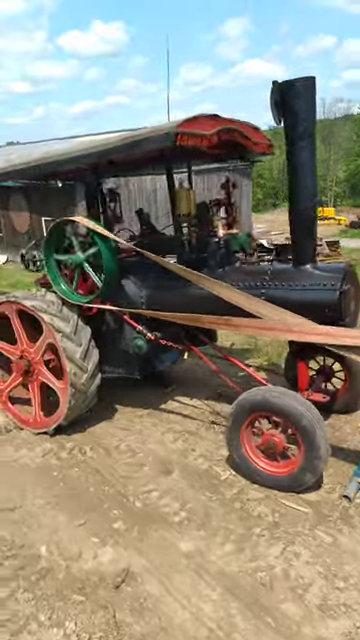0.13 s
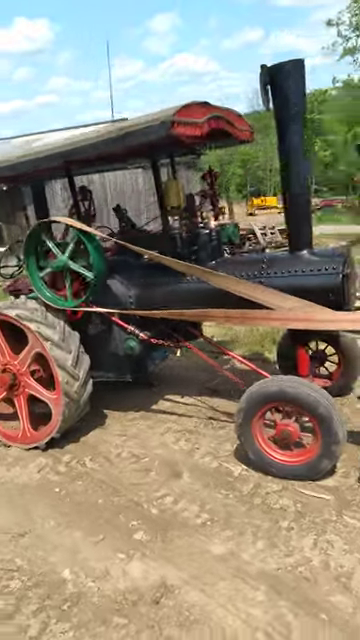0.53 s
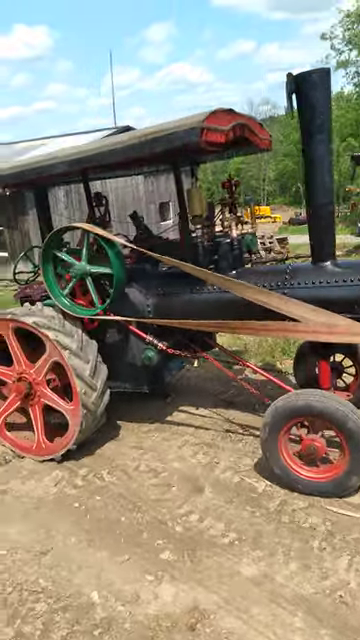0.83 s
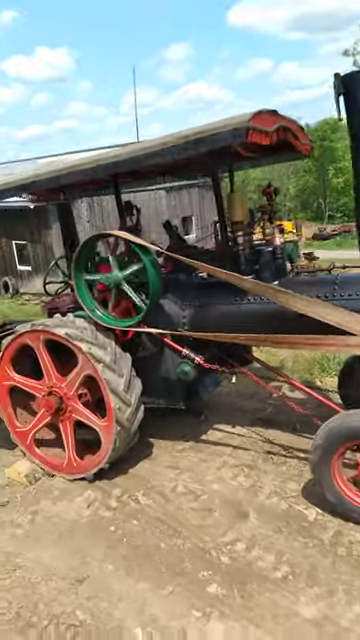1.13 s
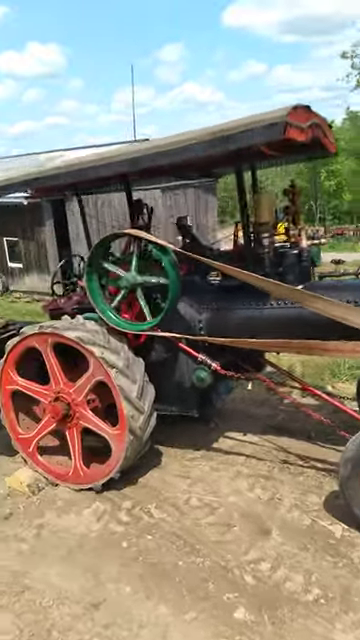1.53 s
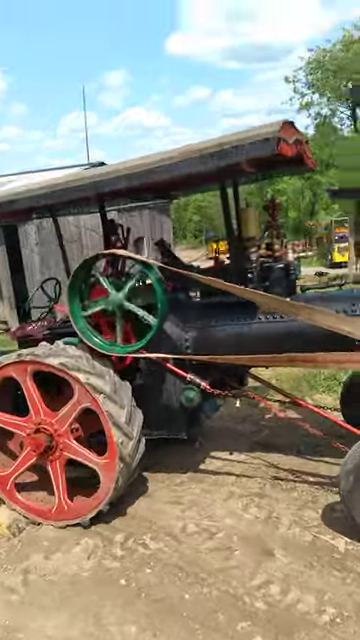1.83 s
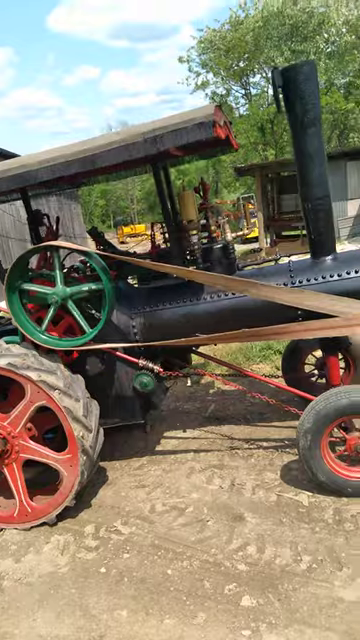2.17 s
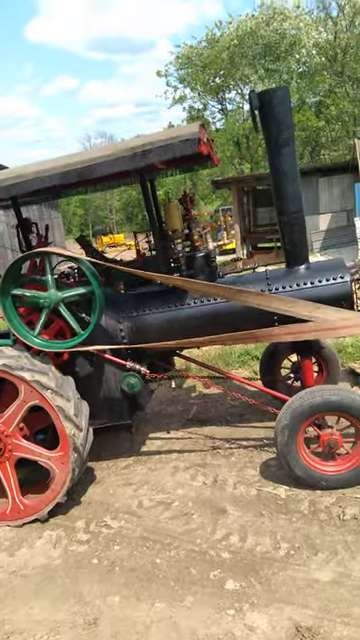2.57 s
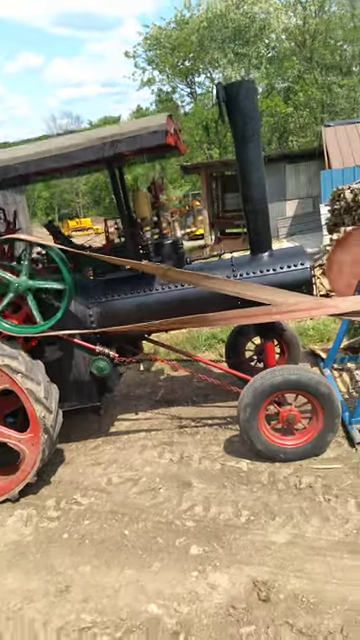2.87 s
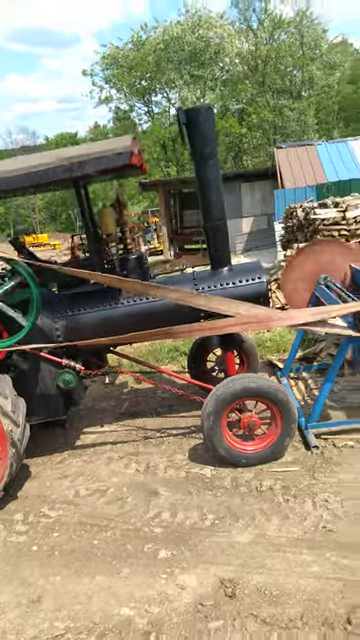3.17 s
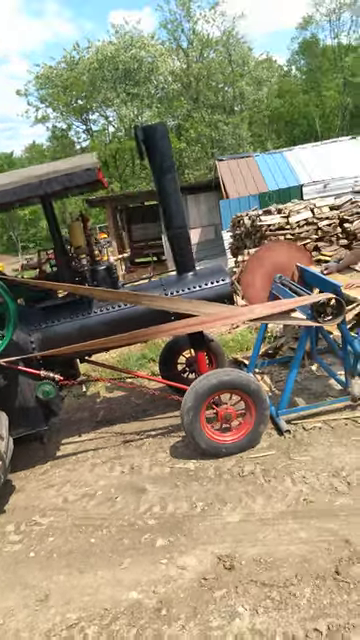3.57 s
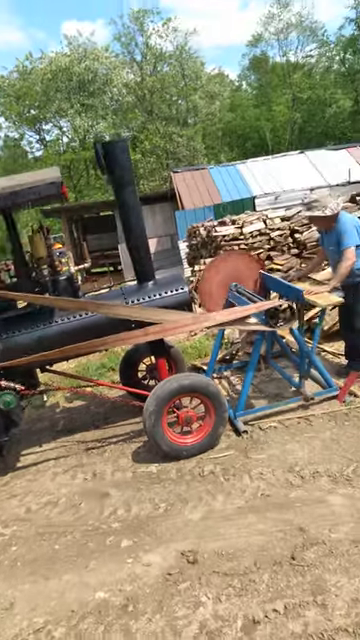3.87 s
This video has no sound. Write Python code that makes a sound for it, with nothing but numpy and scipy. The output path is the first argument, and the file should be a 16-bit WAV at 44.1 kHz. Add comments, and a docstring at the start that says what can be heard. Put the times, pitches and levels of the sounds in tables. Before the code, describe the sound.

Circular saw cutting wood outdoors beside a small steam engine. At 0-0.5 s the blade brushes wood, an offcut scrapes thinly, and knocks tumble near 0.35 s. Until 1.65 s there is quiet rumbling, hissing puffs, valve clicks and a faint whine near 1.1 s. From 1.75 to 3.5 s a loud, shrill rasp, right-heavy, slows slightly with dull knocking; then ringing tones, soft knocks and airy brushes from 3.75 s.

```python
"""A loose offcut scrapes and a saw blade brushes wood over a small steam traction engine idling outdoors.
The cut piece knocks and tumbles; then a log meets the belt-driven circular saw and the engine slows.
Shaped noise makes the tooth rasp, the scrape and the steam; resonators make the ringing disc; decaying
sines make the knocks; pulses make the exhaust. The saw is louder on the right; loud peaks overload softly."""
import sys
import numpy as np
from scipy import signal
from scipy.fft import rfft, irfft, next_fast_len
from scipy.io import wavfile
from scipy.ndimage import uniform_filter1d, map_coordinates

SR = 44100
rng = np.random.default_rng(int(sys.argv[2]) if len(sys.argv) > 2 else 0)


def to_wav(s):
    """Save 16-bit WAV."""
    ch = np.atleast_2d(s).T  # columns
    pcm = np.round(np.clip(ch, -1, 1) * 32767)  # PCM
    wavfile.write(sys.argv[1], SR, pcm.astype(np.int16))


N = 176400
T = np.arange(N) / SR

# The log in the blade: start_s [s], rasp_level_db [dB], ring_over_rasp_db [dB],
# rasp_left_right_db [dB, used about its mean over time]
CUT_STAGES = [(1.66, -57, 0, -16), (1.71, -18.5, -29, -14.5), (1.79, -9, -6, -8.5), (2.39, -7, -9, -8),
              (2.87, -8.5, -10.5, -13), (3.47, -9, -14.5, -11.5), (3.54, -19, -8, -14), (3.67, -30, -3, -8),
              (3.76, -25.5, -6.5, -10.5)]
# Left-right likeness of the saw and offcut noise: pitch_hz [Hz], likeness [-1 to 1]
SAW_LIKENESS = [(60, 0.82), (240, 0.25), (950, 1), (3770, -0.44), (15000, -0.11)]
# Left-right likeness of the engine noise: pitch_hz [Hz], likeness [-1 to 1]
IDLE_LIKENESS = [(60, 0.94), (180, 0.98), (550, 0.74), (1650, 1), (4970, -0.32), (15000, 0.33)]
# Port balance for the engine and offcut: pitch_hz [Hz], left_right_db [dB]
IDLE_BALANCE = [(60, 0.5), (290, 1.5), (640, -8.5), (1410, 2.5), (3100, -8.5), (6820, -19), (15000, -22)]


def amp(db):
    """Amplitude factor of a level in dB."""
    return 10 ** (np.asarray(db) / 20)


def unit(x):
    """x scaled to an rms of 1."""
    return x / np.sqrt(np.mean(x ** 2) + 1e-20)


def along(points, hz):
    """Read a curve of (Hz, value) points on a log frequency axis."""
    f, v = np.transpose(points)
    return np.interp(np.log(hz + 1), np.log(f + 1), v)


def curves(rows):
    """One value per sample for each column after the time."""
    s, *cols = np.transpose(rows)
    return [np.interp(T, s, c) for c in cols]


def wobble(rate):
    """A smooth random curve through `rate` random knots a second."""
    coarse = T[::64]
    knots = rng.standard_normal(int(N * rate / SR) + 4)
    return np.interp(T, coarse, map_coordinates(knots, [coarse * rate]))


def filtered(x, response):
    """Multiply the spectrum of x by a complex response of frequency."""
    m = next_fast_len(N + SR // 2)
    return irfft(rfft(x, m) * response(np.fft.rfftfreq(m, 1 / SR)), m)[..., :N]


def peak(f, hz, width):
    """Response of one causal resonance, 1 at its centre."""
    return 1j * f * width / (hz * hz - f * f + 1j * f * width)


def ports(pair, balance):
    """Two microphone ports colour the sound oppositely about a mean gain of 1; the left hears it later."""
    left_lag_s = .00013

    def response(hz):
        share = 2 / (1 + amp(np.outer([-1, 1], along(balance, hz))))
        return share * np.exp(np.outer([-1, 0], 2j * np.pi * hz * left_lag_s))

    return filtered(pair, response)


def rush(gain, likeness, patchy_db):
    """Stereo noise of rms 1: random patches of gain in time and pitch, then colour and stereo width."""
    z = signal.stft(rng.standard_normal((2, N)), nperseg=512)[2]
    field = uniform_filter1d(rng.standard_normal(z.shape[1:]), 3, 0)
    field = uniform_filter1d(field, 10, 1)
    pair = signal.istft(z * amp(patchy_db * unit(field)), nperseg=512)[1][:, :N]

    def mid_side(hz):
        turn = np.arccos(np.clip(along(likeness, hz), -1, 1)) / 2
        return gain(hz) * np.array([np.cos(turn), np.sin(turn)])

    mid, side = filtered(pair, mid_side)
    return unit(np.array([mid + side, mid - side]))


def exhaust():
    """Each exhaust beat sends one low thump up the stack, a sine under a Gaussian swell."""
    # Engine beats: start_s [s], beats_so_far [count]
    beat_count = [(-.062, -1), (.99, 12), (1.623, 20), (2.008, 25), (2.566, 32), (3.005, 37), (3.449, 42),
                  (3.831, 46), (4.03, 48)]
    # Exhaust loudness: start_s [s], level_db [dB]
    exhaust_level = [(0.0, -54), (0.72, -56.5), (2.29, -40), (3.32, -46.5), (4.0, -46.5)]
    thump_hz, thump_s, scatter_db = 79.4, 0.012, 2
    count = uniform_filter1d(curves(beat_count)[0], size=4410, mode="nearest")
    at = np.flatnonzero(np.diff(np.floor(count)))
    blows = np.zeros(N)
    blows[at] = amp(rng.normal(0, scatter_db, len(at)))
    t = np.arange(-2200, 2200) / SR
    thump = np.exp(-(t / thump_s) ** 2) * np.sin(2 * np.pi * thump_hz * t)
    return unit(signal.fftconvolve(blows, thump, "same")) * amp(curves(exhaust_level)[0])


def running_gear():
    """The running gear rumbles and clatters as coloured noise of wavering level."""
    # Colour of the running gear: pitch_hz [Hz], density_db [dB per Hz, relative]
    gear_colour = [(30, -36), (45, -44), (65, -3), (153, -5), (191, 1), (243, -11), (363, -5.5), (760, -18),
                   (1030, 0), (1220, -12.5), (1400, 1), (1540, -1), (1800, -11.5), (2600, -29),
                   (5280, -120)]
    noise = rush(lambda f: amp(along(gear_colour, f)), IDLE_LIKENESS, patchy_db=0.5)
    return noise * amp(-40.5 + 2.2 * wobble(29.8))


def gear_whine():
    """A gear whines for a moment: one sine of slightly wandering pitch, faded in and out."""
    whine_hz, wander_hz, level_db = 1349, 3, -43.5
    tone = np.sqrt(2) * np.sin(2 * np.pi * np.cumsum(whine_hz + wander_hz * wobble(11)) / SR)
    start_s, end_s = 0.96, 1.28
    fade = np.interp(T, [start_s - .1, start_s, end_s, end_s + 0.059], [0, 1, 1, 0])
    return tone * amp(level_db) * fade


def steam():
    """Leaking steam hisses, puffs at a steady period until the cut is under way, and bursts as valve clicks."""
    # Colour of the steam: pitch_hz [Hz], density_db [dB per Hz, relative]
    steam_colour = [(1060, -35), (1800, -16), (2100, -2.5), (4360, -7.5), (6690, -7.5), (7880, -1),
                    (9460, 4), (11600, -7.5), (15900, -16)]
    # Valve gear clicks: start_s [s], level_db [dB, before click_trim_db]
    valve_clicks = [(0.6195, -26), (0.6913, -28), (0.9357, -27), (1.099, -26.5), (1.121, -26), (1.169, -20),
                    (1.2546, -30), (1.2794, -28), (1.3279, -26), (1.4122, -28), (1.4354, -26),
                    (1.5364, -29), (1.568, -31), (1.5908, -26), (1.6407, -26)]
    leak_db, click_trim_db, click_decay_s = -48.5, -17, 0.0067
    puff_start_s, puff_every_s, puff_s = .146, .158, 0.031
    puff_db, puff_swing_db = -50, 3
    since = (T - puff_start_s) % puff_every_s
    puffs = amp(puff_db + puff_swing_db * wobble(42.6)) * np.exp(-(since / puff_s) ** 2)
    level = amp(leak_db) + puffs * (T < CUT_STAGES[1][0])
    for s, db in valve_clicks:
        level = level + amp(db + click_trim_db) * (T > s) * np.exp(-np.abs(T - s) / click_decay_s)
    return rush(lambda f: amp(along(steam_colour, f)), IDLE_LIKENESS, patchy_db=0.5) * level


def engine():
    """Running gear, whine and steam reach the two ports together."""
    return ports(running_gear() + steam() + gear_whine(), IDLE_BALANCE)


def offcut():
    """A loose offcut scrapes the disc: banded noise that dies away as the cut piece comes free."""
    # Scrape bands: pitch_hz [Hz], width_hz [Hz], level_db [dB]
    scrape_bands = [(2730, 120, 4), (3750, 200, 4.5), (5500, 410, 2), (11100, 130, 6), (15400, 260, -11)]
    # Scrape loudness: start_s [s], level_db [dB]
    scrape_level = [(0, -35), (.15, -36.5), (.19, -47), (.25, -51.5), (.27, -41), (.38, -41.5), (.41, -49),
                    (.45, -47), (.6, -72)]
    floor_db, swing_db = -13.5, 3

    def colour(f):
        bands = sum(amp(db) * peak(f, hz, width) for hz, width, db in scrape_bands)
        return np.abs(amp(floor_db) * (f > 1800) + bands)

    level = amp(curves(scrape_level)[0] + swing_db * wobble(22.3)) * (T < scrape_level[-1][0])
    return ports(rush(colour, SAW_LIKENESS, patchy_db=2) * level, IDLE_BALANCE)


def knocks():
    """A cut piece falls and tumbles: each blow and its noisy rattle ring the modes of the wood."""
    # Blows: start_s [s], level_db [dB], rattle_s [s]
    wood_blows = [(.3475, -19, .004), (.353, -21, .02), (.41, -28, .03), (.445, -28, .025), (3.6, -32, .06),
                  (3.735, -28, .06)]
    # Modes of the cut piece: pitch_hz [Hz], level_db [dB], t60_s [s to fall 60 dB]
    wood_modes = [(200, -1, .04), (370, -2, .05), (600, -5, .03), (1491, -3, .02), (2200, -7, .012)]
    rise_s = .0015
    blows, t, noise = np.zeros(N), T[:SR // 10], rng.standard_normal(N)
    for s, db, rattle_s in wood_blows:
        blows[round(s * SR)] += amp(db)
        rattle = noise * (T > s) * np.exp(-np.abs(T - s) / rattle_s)
        blows += amp(db) * rattle / np.sqrt(rattle_s * SR)
    body = sum(amp(db - 60 * t / t60) * np.sin(2 * np.pi * hz * t) for hz, db, t60 in wood_modes)
    return signal.fftconvolve(blows, body * (1 - np.exp(-t / rise_s)))[:N]


def hum():
    """The disc's two lowest modes swell and fade as sines of wandering pitch."""
    # Mode loudness: start_s [s], lower_db [dB], upper_db [dB]
    hum_levels = [(0.03, -35.5, -49), (0.122, -44, -55), (0.143, -32, -39), (0.19, -38, -51),
                  (0.224, -33, -39), (0.34, -34, -50), (0.37, -39, -45), (0.46, -39, -57),
                  (0.52, -49.5, -70), (1.51, -81, -71), (1.85, -41, -29.5), (1.89, -39, -47),
                  (1.93, -30, -24), (2.32, -44, -28.5), (2.35, -34, -33), (2.45, -38, -18),
                  (2.65, -35.5, -32.5), (2.81, -27.5, -25), (2.92, -48, -38), (3.02, -26, -32.5),
                  (3.69, -72, -38.5), (3.82, -36.5, -45.5), (4.0, -59, -46)]
    swing_db = 2
    pitches_hz, wanders_hz, left_right_db = (194, 539), (4, 3), (4.5, 10.5)
    out = np.zeros((2, N))
    for db, hz, wander, pan in zip(curves(hum_levels), pitches_hz, wanders_hz, left_right_db):
        level = amp(db + swing_db * wobble(20))
        tone = np.sqrt(2) * np.sin(2 * np.pi * np.cumsum(hz + wander * wobble(40.59)) / SR)
        out += np.outer(amp([pan / 2, -pan / 2]), level * tone)
    return out


def proud_tooth():
    """One tooth stands proud and knocks the bench once a turn, each knock a few short-lived modes."""
    # Knocking turns: start_s [s], turns_so_far [count], level_db [dB, before knock_trim_db]
    proud_turns = [(2.1, 0, -34), (2.353, 5, -22), (2.571, 9, -23), (2.86, 14, -23), (3.155, 19, -30)]
    # Bench modes: pitch_hz [Hz, before scatter], level_db [dB, relative], left_right_db [dB]
    bench_modes = [(368, -15, -6), (904, 0, -15), (1284, -8, -6)]
    rise_s, knock_trim_db, level_scatter_db, pitch_scatter = 0.0051, 1, 2, 0.032
    s, turns, db = np.transpose(proud_turns)
    at = np.interp(np.arange(turns[-1] + 1), turns, s)
    t, out = T[:SR // 20], np.zeros((2, N))
    swell = t / rise_s * np.exp(1 - t / rise_s)  # fullest at rise_s
    for when, draws in zip(at, rng.standard_normal((len(at), len(bench_modes), 2))):
        start = round((when - rise_s) * SR)
        for (hz, mode_db, pan_db), (a, b) in zip(bench_modes, draws):
            ring = swell * np.sin(2 * np.pi * hz * (1 + pitch_scatter * a) * t)
            level_db = np.interp(when, s, db) + knock_trim_db + mode_db + level_scatter_db * b
            gain = amp(level_db + np.array([pan_db, -pan_db]) / 2)
            out[:, start:][:, :len(t)] += np.outer(gain, ring)
    return out


def teeth():
    """Teeth passed so far, per sample: the running sum of a tooth rate that falls as the saw slows."""
    # Teeth passing: start_s [s], tooth_rate_hz [Hz]
    tooth_rate = [(0, 1420), (2.2, 1415), (2.45, 1330), (3.1, 1255), (4, 1235)]
    return np.cumsum(curves(tooth_rate)[0]) / SR


def contact():
    """How hard the teeth bear on wood: the cut, wavering once a turn, and separate brushes of the blade."""
    # Blade brushes wood: start_s [s], level_db [dB, before brush_trim_db], length_s [s, Gaussian decay]
    brushes = [(0.075, -24.5, 0.015), (0.13, -21, 0.018), (0.2049, -31, 0.011), (0.26, -32.5, 0.017),
               (0.297, -28.5, 0.016), (1.686, -28, 0.043), (3.762, -10.5, 0.076), (3.815, -12, 0.091),
               (3.888, -10, 0.058), (3.947, -12.5, 0.064)]
    brush_trim_db, rise_share, turn_wobble_db, teeth_per_turn = -5.5, 0.24, 0.5, 72
    level_db, ring_db, pan_db = curves(CUT_STAGES)
    turn_db = turn_wobble_db * np.sin(2 * np.pi * teeth() / teeth_per_turn)
    cut = amp(level_db + turn_db) * (T > CUT_STAGES[0][0]) * (T < CUT_STAGES[-1][0] + .02)
    brush = np.zeros(N)
    for s, db, length in brushes:
        rise = np.clip((T - s) / (rise_share * length), 0, 1)
        decay = np.exp(-(np.clip(T - s, 0, 9) / length) ** 2)
        brush += amp(db + brush_trim_db) * rise * decay
    return cut, brush, ring_db, pan_db - pan_db.mean()


def rasp(cut, brush):
    """Teeth tear the wood: noise coloured by shrill disc resonances, thin in a brush, full in the cut."""
    # Colour of the tearing: pitch_hz [Hz], density_db [dB per Hz, relative]
    rasp_colour = [(59, -46), (100, -13.5), (193, -2.5), (295, -6.5), (470, -4.5), (534, 2), (734, -6),
                   (890, -4), (1080, 1.5), (1420, -3.5), (2680, -10.5), (6520, -8), (9360, -1),
                   (15900, -13.5)]
    # Chosen upper modes: width_hz [Hz], level_db [dB]
    shrill_modes = [(100, -8), (80, 11), (200, 6.5), (150, 6), (55, -2)]
    # Pitches of those modes [Hz]
    shrill_hz = (6080, 9120, 9570, 9950, 10690)
    crowd_db, crowd_width_hz = 4, 26.3
    brush_hz = 3120  # a light brush sounds mostly above this
    body_hz, body_build_s = 1000, .19  # the low body builds up as the blade sinks in
    flutter_db = 0.5
    crowd_hz = rng.uniform(2200, 15500, size=160)
    grid = np.arange(0, SR / 2, 4)
    chosen = sum(amp(db) * peak(grid, hz, width) for hz, (width, db) in zip(shrill_hz, shrill_modes))
    crowd = amp(crowd_db) * sum(peak(grid, hz, crowd_width_hz) for hz in crowd_hz)
    shape = np.abs(1 + chosen + crowd)
    noise = rush(lambda f: amp(along(rasp_colour, f)) * np.interp(f, grid, shape), SAW_LIKENESS, patchy_db=2)
    thin = filtered(noise, lambda f: f * f / (f * f + brush_hz ** 2))
    body = filtered(noise, lambda f: 1 / (1 + (f / body_hz) ** 4))
    body_missing = np.exp(-(np.clip(T - CUT_STAGES[0][0], 0, None) / body_build_s) ** 2)
    return ((noise - body_missing * body) * cut + thin * brush) * amp(flutter_db * wobble(24.75))


def disc_ring(cut, brush, ring_db):
    """Tearing noise and a noisy tone at the tooth rate shake the disc's modes, which ring on."""
    # Modes of the disc: pitch_hz [Hz], level_db [dB, relative to their total]
    disc_modes = [(581.4, -20), (678.3, -21.5), (1061, -23), (1217, -39.5), (1270, -43.5), (1405, -44),
                  (1523, -40), (1690, -19), (1841, -19.5), (2089, -32), (2342, -15.5), (2627, -16),
                  (2686, -12), (2945, -12.5), (3300, -24), (4011, -14)]
    ring_trim_db, brush_ring_db, swing_db = -1, -12, 3
    tooth_db, tooth_width_hz = 11, 59
    brush_tear_db = -7  # a brush shakes the disc mostly at the tooth rate
    width_1k_hz, widens = 11.8, 0.043  # mode width at 1 kHz and its power-law growth with pitch
    drift = filtered(rng.standard_normal(N), lambda f: 1 / (1 + 1j * f / tooth_width_hz) ** 3)
    sing = np.cos(2 * np.pi * teeth()) * unit(drift)
    deep, light = cut * amp(ring_db + ring_trim_db), brush * amp(brush_ring_db)
    tearing = rng.standard_normal(N) * (deep + light * amp(brush_tear_db))
    shake = tearing + amp(tooth_db) * sing * (deep + light)
    total = np.sqrt(sum(amp(db) ** 2 for _, db in disc_modes))
    ring = np.zeros((2, N))
    for hz, db in disc_modes:
        width = width_1k_hz * (hz / 1000) ** widens
        drive = shake * amp(swing_db * wobble(4.854))
        mode = signal.lfilter(*signal.iirpeak(hz, hz / width, SR), drive)
        mode = mode * np.sqrt(SR / np.pi / width)  # evens out the energy narrow modes lose
        pan = amp(swing_db * rng.standard_normal() * np.array([.5, -.5]))
        ring += np.outer(pan, mode) * amp(db) / total
    return ring


def freed_tones():
    """Pure tones sing briefly as the log parts, swelling and fading as a Gaussian."""
    # Tones: pitch_hz [Hz], peak_db [dB]
    parting_tones = [(2061, -32), (2733, -31)]
    middle_s, length_s = 3.55, .07
    tones = sum(amp(db) * np.sin(2 * np.pi * hz * T) for hz, db in parting_tones)
    return tones * np.exp(-((T - middle_s) / length_s) ** 2)


def saw():
    """Rasp and disc ring reach the two ports; the left-right balance of the rasp moves with the cut."""
    # Port balance for the saw: pitch_hz [Hz], left_right_db [dB]
    saw_balance = [(60, 9), (200, -9.5), (380, -1.5), (700, -8.5), (1290, 0.5), (2380, -6.5), (4400, -8.5),
                   (8120, -25), (15000, -9)]
    cut, brush, ring_db, pan_db = contact()
    tearing = ports(rasp(cut, brush), saw_balance) * amp(np.outer([1, 0], pan_db))
    ringing = ports(disc_ring(cut, brush, ring_db), saw_balance)
    return tearing + ringing + freed_tones()


def scene():
    """The engine, the loose wood and the saw together."""
    return exhaust() + engine() + offcut() + knocks() + hum() + proud_tooth() + saw()


def record(dry):
    """The input overloads softly; nothing is kept above the band limit."""
    ceiling, hardness, top_hz = 1, 4.5, 16030
    loud = dry / (1 + np.abs(dry / ceiling) ** hardness) ** (1 / hardness)
    return filtered(loud, lambda hz: hz < top_hz)


dry = scene()
out = record(dry)
to_wav(out)
```